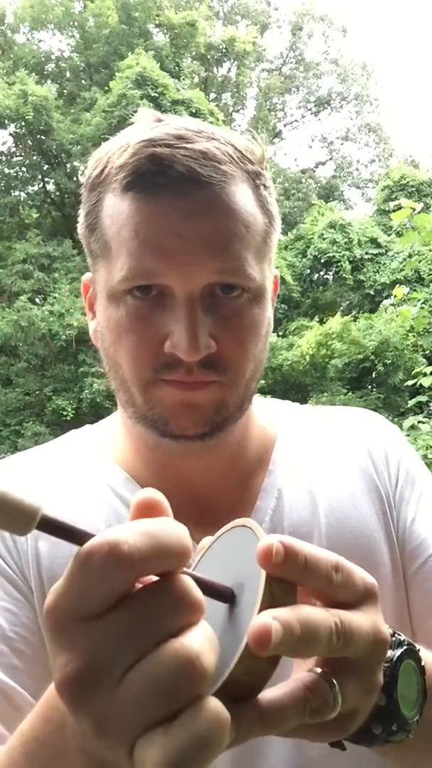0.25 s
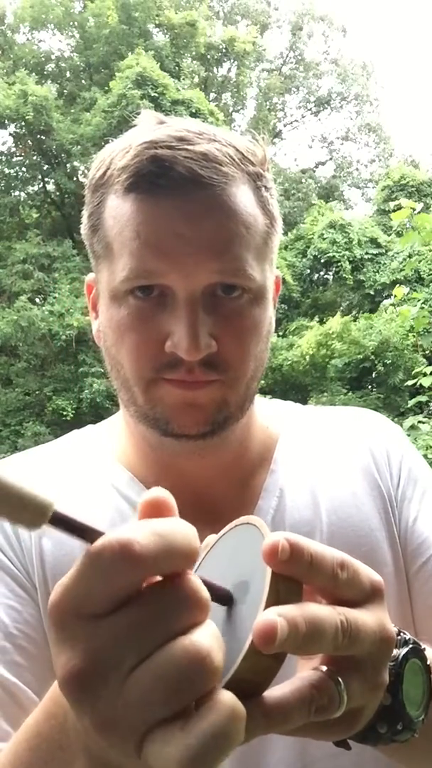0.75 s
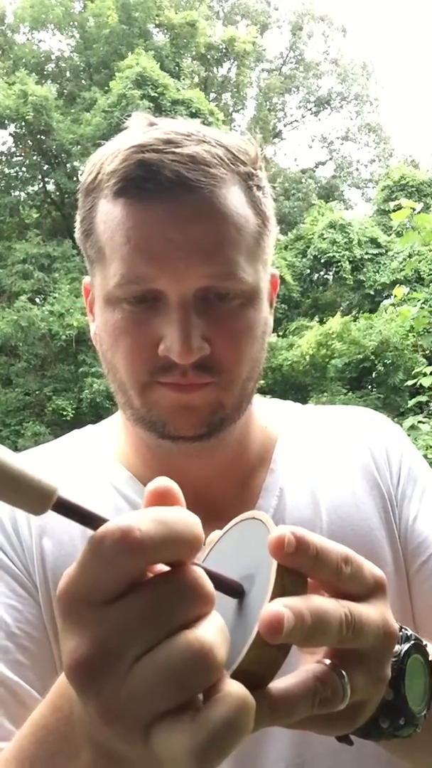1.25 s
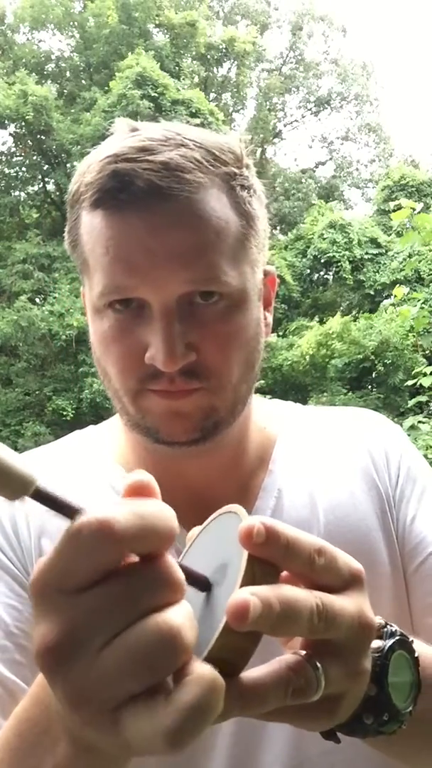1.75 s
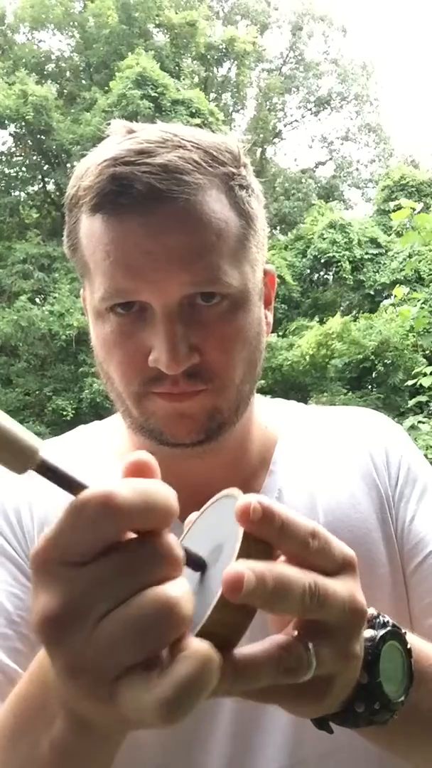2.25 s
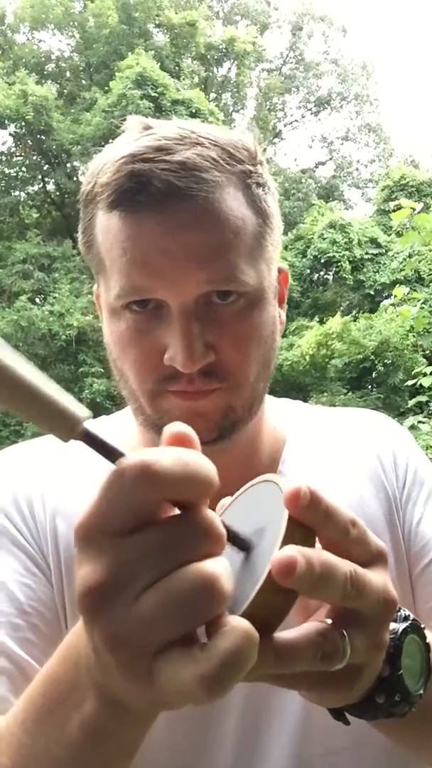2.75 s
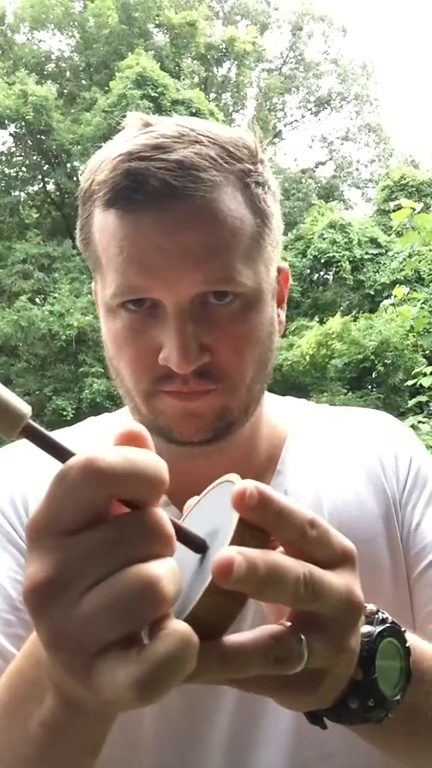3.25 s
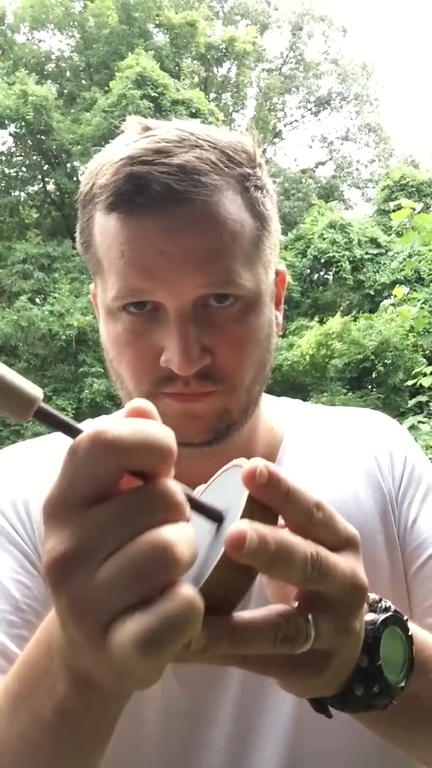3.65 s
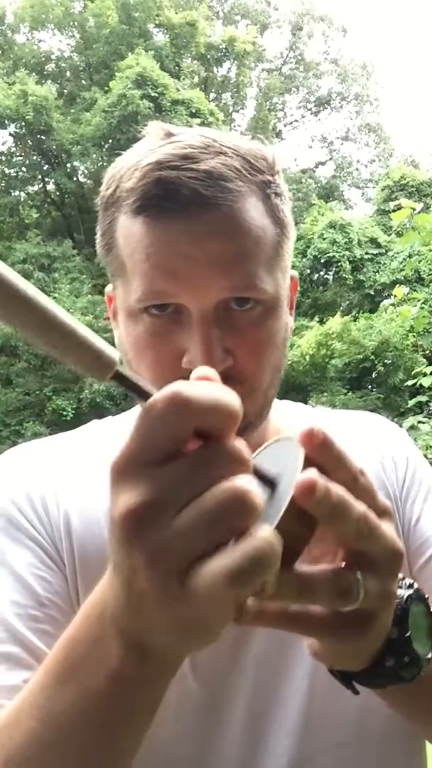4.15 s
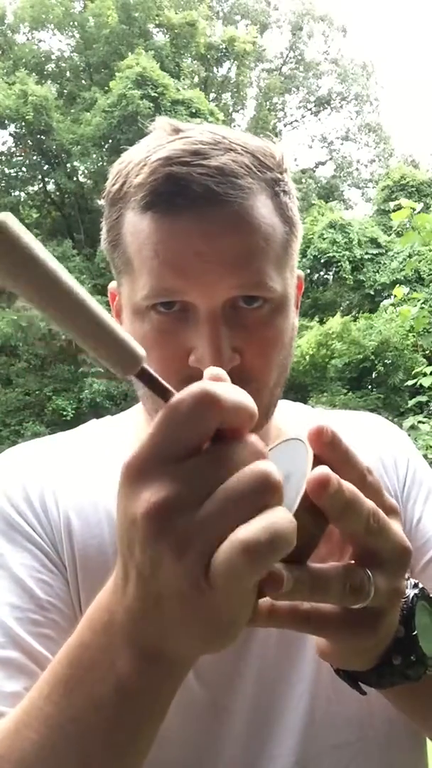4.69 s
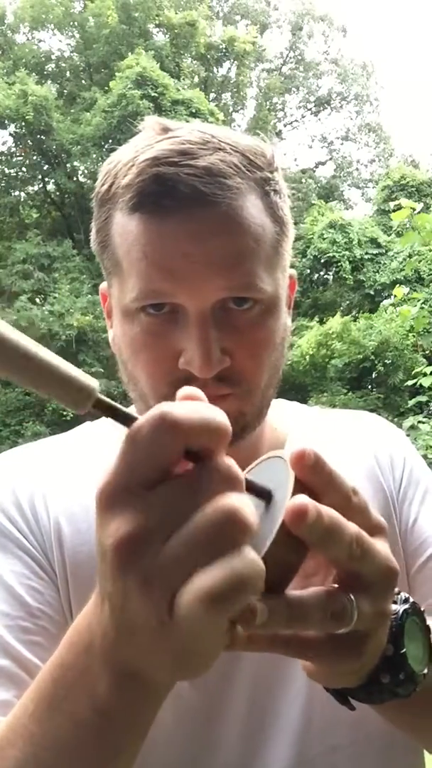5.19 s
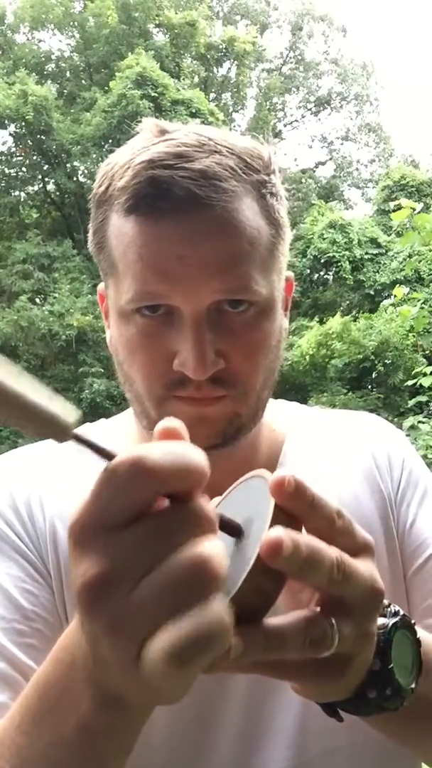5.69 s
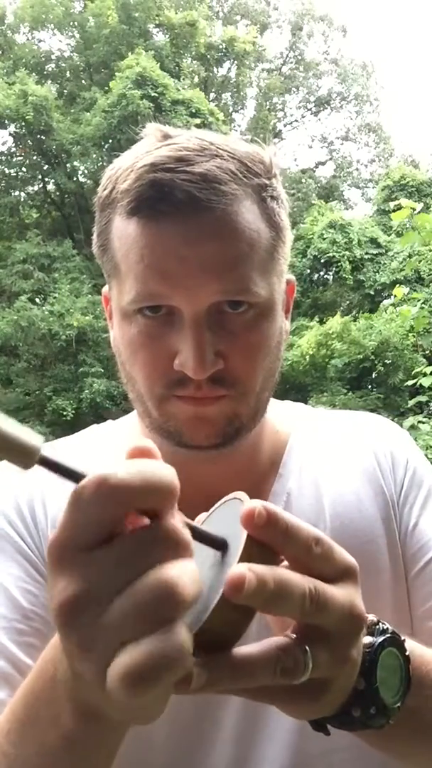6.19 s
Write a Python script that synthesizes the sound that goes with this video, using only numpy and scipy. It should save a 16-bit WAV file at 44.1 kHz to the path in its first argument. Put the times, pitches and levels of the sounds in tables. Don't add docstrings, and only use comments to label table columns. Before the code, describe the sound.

A wooden striker on slate snaps out a tail-end yelp, thirteen sharp clucks, then a run of two-part turkey-like yelps, close up outdoors.

```python
import sys
import numpy as np
from scipy import signal
from scipy.io import wavfile
from scipy.ndimage import uniform_filter1d

SR = 44100
rng = np.random.default_rng(int(sys.argv[2]) if len(sys.argv) > 2 else 0)


def waveform_to_disk(signal):
    frames = np.transpose(np.atleast_2d(signal))
    scaled = np.clip(frames, -1, 1) * 32767
    samples = np.round(scaled).astype(np.int16)
    wavfile.write(sys.argv[1], SR, samples)


def level_to_linear(level):
    exponent = np.asarray(level, float) / 20
    return 10 ** exponent


N = 283563
FIRM_DB = -8
BREAK_HZ, RASP_ROUGH, RASP_END_DB = 750, .12, -19


def rms_one(x):
    return x / np.sqrt(np.mean(x ** 2) + 1e-20)


def in_time(rows):
    t_s, *columns = np.transpose(sorted(rows))
    return [np.interp(np.arange(N) / SR, t_s, column) for column in columns]


def low_pass(x, top_hz):
    return signal.lfilter(*signal.butter(2, top_hz, fs=SR), x)


def band_pass(x, low_hz, high_hz):
    return signal.sosfilt(signal.butter(2, [low_hz, high_hz], "band", fs=SR, output="sos"), x)


def slow_noise(top_hz, count=1):
    return np.array([rms_one(low_pass(white, top_hz)) for white in rng.standard_normal((count, N))])


def resonance(x, hz, width_hz):
    r = np.exp(-np.pi * width_hz / SR)
    poles = [1, -2 * r * np.cos(2 * np.pi * hz / SR), r * r]
    return signal.lfilter(np.array([1, 0, -1]) * (1 - r * r) / 2, poles, x)



def note(touch_s, grip_s, touch_hz, grip_hz, db, end_s):
    touch_rough, touch_sharp, rough = .12, .41, .08
    sharp = .745 + .027 * (db - FIRM_DB)
    high = 1.035
    settled_s = min(grip_s + .011, end_s - .002)
    slowed_hz = max(touch_hz * .96, grip_hz)
    return [(touch_s - .02, touch_hz, -90, 0, 0, touch_sharp),
            (touch_s, touch_hz, -45, 0, touch_rough, touch_sharp),
            (touch_s + .009, touch_hz, -23.5, 0, touch_rough, touch_sharp),
            (grip_s - .003, slowed_hz, db - 8, 0, touch_rough, touch_sharp),
            (grip_s, grip_hz * high, db - 4, 0, rough, sharp - .15),
            (grip_s + .004, grip_hz * (1 + high) / 2, db - .6, 0, rough, sharp - .07),
            (settled_s, grip_hz, db, 0, rough, sharp),
            (end_s, grip_hz * 1.01, db, 0, rough, sharp)]


def rasp(start_s, sag_s, end_s, db, fade_db, note_db, low_hz):
    press_db = 1.1 * (note_db - FIRM_DB)
    soften = .055 + .016 * (FIRM_DB - note_db)
    sharp = .87
    # t/s, slip rate f/Hz, level/dB, pairing/dB, sharpness/1
    course = [(start_s, BREAK_HZ, min(db + .6, note_db + 1.5), -5.5 + press_db, sharp - 2.5 * soften),
              (sag_s, 746, db, -3, sharp - soften / 2),
              (sag_s + .022, low_hz, db + .5, -9 + press_db * .3, sharp - soften / 2),
              (end_s - .019, (low_hz + 696) / 2, db + fade_db, -15 + press_db * .5, sharp - 1.5 * soften),
              (end_s, 768, RASP_END_DB, -18, .68)]
    return [(s, hz, level_db, level_to_linear(pair_db - .5), RASP_ROUGH, shape)
            for s, hz, level_db, pair_db, shape in course]


# after stroke t/s, pulse rate f/Hz, re last level/dB, sharpness/1
LIFT_OFF = [(.003, 840, -6.5, .66), (.006, 970, -13, .15), (.011, 1010, -19, .03), (.018, 1020, -27, .02),
            (.032, 1020, -60, .02)]


def lift_off(end_s, last_db):
    return [(end_s + after_s, hz, last_db + db, 0, .1, sharp) for after_s, hz, db, sharp in LIFT_OFF]


# touch t/s, grip t/s, touch rate f/Hz, grip rate f/Hz, level/dB
YELP_NOTES = [(-.05, -.025, 1100, 970, -8), (3.749, 3.772, 1000, 958, -19), (4.285, 4.308, 1025, 990, -16),
              (4.635, 4.655, 1085, 965, -8.5), (4.932, 4.959, 1130, 965, -7.5),
              (5.24, 5.26, 1110, 965, -8.5), (5.542, 5.575, 1150, 975, -10.5),
              (5.879, 5.902, 1130, 958, -7), (6.222, 6.257, 1100, 962, -11)]
# break t/s, sag t/s, end t/s, level/dB, fade before end/dB
YELP_RASPS = [(.019, .044, .092, -12.5, -.6), (3.796, 3.833, 3.892, -13.5, .5),
              (4.321, 4.364, 4.452, -14, .5), (4.704, 4.727, 4.788, -11, -4), (5.01, 5.027, 5.085, -10, -8),
              (5.303, 5.32, 5.378, -11, -2), (5.627, 5.644, 5.7, -11.5, -4),
              (5.933, 5.953, 6.022, -10.5, -3), (6.293, 6.31, 6.373, -12.5, -1)]
YELP_SAGS = [720, 688, 686, 689, 704, 684, 702, 678, 680]


def yelps():
    rows = []
    for clear, raspy, low_hz in zip(YELP_NOTES, YELP_RASPS, YELP_SAGS):
        touch_s, grip_s, touch_hz, grip_hz, note_db = clear
        break_s, sag_s, end_s, rasp_db, fade_db = raspy
        glide_s = .0015 + .0006 * max(FIRM_DB - note_db, 0)
        skip_db = note_db - 3 + .9 * (note_db - FIRM_DB)
        rows += note(touch_s, grip_s, touch_hz, grip_hz, note_db, break_s - glide_s)
        rows += [(break_s, (grip_hz + BREAK_HZ) / 2, skip_db, 0, RASP_ROUGH, .6)]
        rows += rasp(break_s + glide_s, sag_s, end_s, rasp_db, fade_db, note_db, low_hz)
        rows += lift_off(end_s, RASP_END_DB)
    return rows


# t/s, peak level/dB, length/s, pitch factor/1, alternation/1
CLUCKS = [(0.614, 1.5, 0.021, 1.02, 0.42), (0.809, 0, 0.025, 1.01, 0.36), (1.136, -0.5, 0.022, 1.013, 0.43),
          (1.666, 0.5, 0.025, 1.01, 0.35), (1.829, 0, 0.023, 1.001, 0.2), (1.99, -2, 0.024, 0.99, 0.15),
          (2.149, -2, 0.021, 0.99, 0.25), (2.326, -3.5, 0.022, 1.01, 0.23), (2.505, -4.5, 0.029, 1.01, 0.3),
          (2.735, -4, 0.025, 1.02, 0.23), (3.034, -3.5, 0.027, 1.001, 0.38),
          (3.362, -2, 0.026, 1.001, 0.19), (4.018, -2, 0.031, 0.93, 0.46)]
# t/length, slip rate f/Hz, re peak/dB, share of roughness/1, sharpness/1
CLUCK_COURSE = [
    (-.9, 900, -47, 3.0, .6),
    (-.19, 920, -42, 2.0, .5),
    (-.1, 900, -22, .6, .4),
    (-.01, 820, -5, 1.0, .75),
    (.28, 700, -3, .9, .81),
    (.6, 735, -3.5, .5, .8),
    (.95, 775, -5, .35, .78),
]


def clucks():
    rows = []
    for s, peak_db, length_s, pitch, alternate in CLUCKS:
        rows += [(s - 1.5 * length_s, CLUCK_COURSE[0][1], -90, 0, 0, .3)]
        rows += [(s + at * length_s, hz * pitch, peak_db + db, alternate * part, .33 * part, sharp)
                 for at, hz, db, part, sharp in CLUCK_COURSE]
        rows += lift_off(s + length_s, peak_db + CLUCK_COURSE[-1][2])
    return rows


# start t/s, end t/s
TRIPLETS = [(6.318, 6.356), (5.338, 5.36)]


def striker(slip_hz, alternate, rough, sharp):
    strength, timing = slow_noise(170, 2)
    tremor, patches = slow_noise(60, 2)
    steady = 2 * np.pi * np.cumsum(slip_hz * (1 + .006 * tremor)) / SR
    group = np.full(N, 2)
    for start_s, end_s in TRIPLETS:
        group[round(start_s * SR):round(end_s * SR)] = 3
    turn = np.clip(alternate, 0, 1.5) * level_to_linear(3.0 * patches) * np.cos(steady / group)
    phase = steady + .24 * turn + .1 * 2 * np.pi * rough * timing
    r = np.clip(sharp, .02, .93)
    pulses = ((1 - r * r) / (1 - 2 * r * np.cos(phase) + r * r) - 1) / (2 * r)
    bite = (3 + 3 * rough) * 2.4 * r ** 2
    sand = rng.standard_normal(N)
    bright_sand = .7 * np.gradient(sand) + .7 * sand
    grit = level_to_linear(-30 + 3 * patches) * bite * bright_sand
    scrape = grit * (.35 * pulses + 1.1)
    return pulses * (1 + turn + rough * strength) + scrape


# f/Hz, width f/Hz, level/dB
POT_MODES = [(658, 190, -30), (884.5, 130, -21.5), (1012.8, 129, -8), (1083, 183, -6.5), (1458.3, 109, 2.5),
             (1913.2, 107.8, 5.5), (2076.3, 156.5, -2), (2445, 180, -11), (3084, 140, -9),
             (3482, 180, -10.5), (3880, 67, -14.5), (4580, 520, -15.5), (5286, 170, -7.5),
             (6487, 400, -11.5), (8700, 1000, -19), (12700, 1800, -22)]


def pot_call():
    slip_hz, level_db, alternate, rough, sharp = in_time(yelps() + clucks())
    rough = np.abs(rough)
    force = striker(slip_hz, alternate, rough, sharp)
    rung = np.zeros(N)
    for k, (hz, width_hz, db) in enumerate(POT_MODES):
        rung += level_to_linear(db) * (-1) ** k * resonance(force, hz, width_hz)
    level_db = level_db + 7 * rough * slow_noise(45)[0]
    return level_to_linear(level_db) * rung / np.sqrt(uniform_filter1d(rung ** 2, size=400) + 1e-12)


# start t/s, level/dB, t60/s, top f/Hz
WOODS = [
    (.002, -24, .06, 15000),
    (.004, -16.5, 0.19, 7000),
    (0.04, -34.5, 0.38, 6000),
    (.09, -54, 1.1, 3000),
]
# delay t/s, level/dB, bottom f/Hz, top f/Hz
WALLS = [(.013, -22, 8000, 15000), (.076, -23, 11500, 14000), (.091, -24, 11000, 13500),
         (.099, -35, 6500, 9500), (.083, -33, 6800, 9500), (.165, -40, 7000, 15000), (.44, -54, 900, 2500)]


def echoes(x):
    t = np.arange(SR) / SR
    reply = np.zeros(SR)
    for (start_s, db, t60_s, top_hz), white in zip(WOODS, rng.standard_normal((len(WOODS), SR))):
        fade = np.clip((t - start_s) / .005, 0, 1) * level_to_linear(-60 * (t - start_s) / t60_s)
        lumps = level_to_linear(4 * rms_one(low_pass(white[::-1], 45)))
        reply += level_to_linear(db - 31.5) * low_pass(white, top_hz) * fade * lumps
    out = signal.fftconvolve(x, reply)[:N]
    for delay_s, db, bottom_hz, top_hz in WALLS:
        slap = np.interp(np.arange(N) - delay_s * SR, np.arange(N), x, left=0)
        out += level_to_linear(db) * band_pass(slap, bottom_hz, min(top_hz, 18000))
    return out


# f/Hz, level/dB per Hz
AIR_SPECTRUM = [(12, -40), (30, -14), (76, -0.5), (175, -11.5), (362, -24), (767, -28), (932, -34.5),
                (1300, -28), (1450, -19), (2030, -29.5), (4810, -44), (6360, -42), (15500, -58)]
# t/s, level/dB
RUMBLE = [(0.0, -52), (0.21, -62.5), (0.53, -57), (1.2, -61), (1.65, -57), (2.35, -70), (3.0, -67),
          (3.9, -62.5), (4.9, -62), (6.43, -67)]


def air():
    swell_db, = in_time(RUMBLE)
    mean_db = swell_db.mean()
    edges_hz = 30 * 2 ** np.arange(0, 9.1, .5)
    white = rng.standard_normal((2, N))
    gust_db = 3.5 * rms_one(low_pass(rng.standard_normal((3, N)), 20))
    hz, db = np.transpose(AIR_SPECTRUM)
    out = np.zeros(N)
    for k, (low_hz, high_hz) in enumerate(zip(edges_hz, edges_hz[1:])):
        band_db = np.interp(np.log(low_hz * high_hz) / 2, np.log(hz), db)
        swell = (swell_db - mean_db) * np.clip(np.log(3000 / low_hz) / 1.2, .6, 1)
        gust = gust_db[k % 3] * (low_hz < 250)
        out += band_pass(white[k % 2], low_hz, high_hz) * level_to_linear(band_db + swell + gust)
    out = signal.sosfilt(signal.butter(4, 45, "high", fs=SR, output="sos"), out)
    return level_to_linear(mean_db + 5.0) * rms_one(out)


# t/s, length/s, start
# f/Hz, end f/Hz, level/dB
FAR_TONES = [(.3, .12, 2660, 2570, -68), (.46, .08, 2560, 2520, -68), (.375, .07, 1935, 1935, -60),
             (.2, .13, 1935, 1935, -62), (4.1, .2, 3830, 3800, -64), (4.52, .16, 2900, 2800, -69)]


def far_tones():
    t, out = np.arange(N) / SR, np.zeros(N)
    warble = level_to_linear(4.2 * slow_noise(40)[0])
    for s, length_s, start_hz, end_hz, db in FAR_TONES:
        part = np.clip((t - s) / length_s, 0, 1)
        phase = 2 * np.pi * np.cumsum(start_hz + (end_hz - start_hz) * part) / SR
        out += level_to_linear(db) * np.sin(np.pi * part) ** .4 * np.sin(phase)
    return out * warble


def scene():
    call = pot_call()
    return (call + echoes(call) + air() + far_tones())[None]


def top_cut(x):
    return signal.sosfilt(signal.butter(12, 15780, fs=SR, output="sos"), x)


def record(dry):
    ceiling, knee = .735, 3.6
    bent = dry + .036 * dry ** 2 + .017 * low_pass(dry ** 4, 45)
    held = bent / (1 + np.abs(bent / ceiling) ** knee) ** (1 / knee)
    return top_cut(held)


dry = scene()
out = record(dry)
waveform_to_disk(out)
```